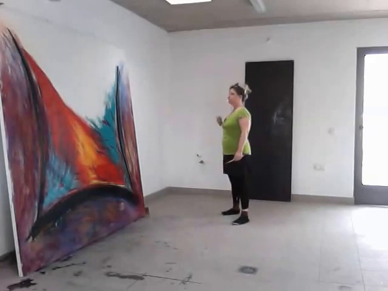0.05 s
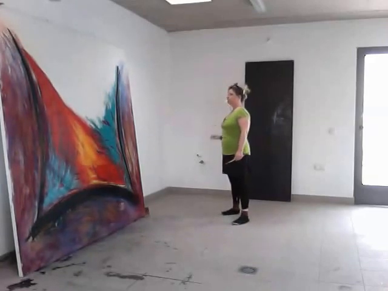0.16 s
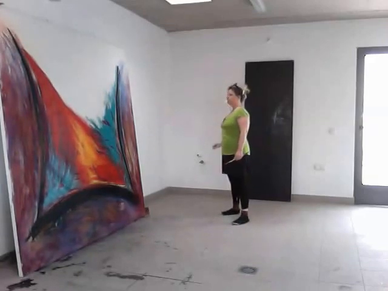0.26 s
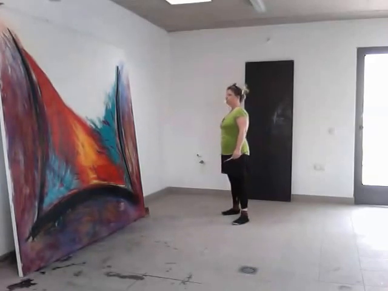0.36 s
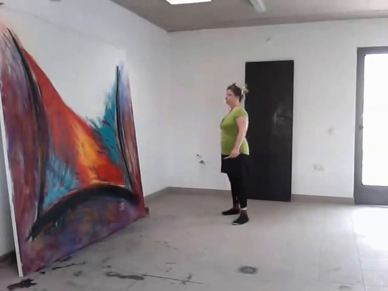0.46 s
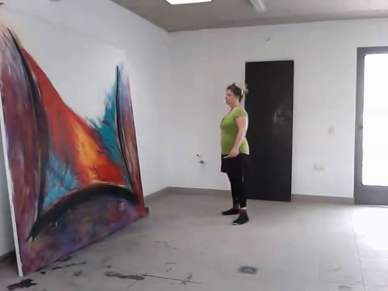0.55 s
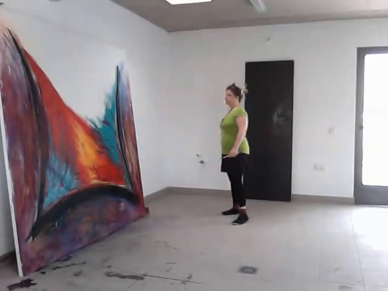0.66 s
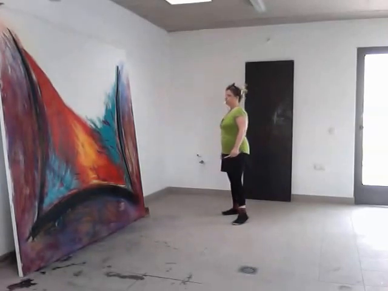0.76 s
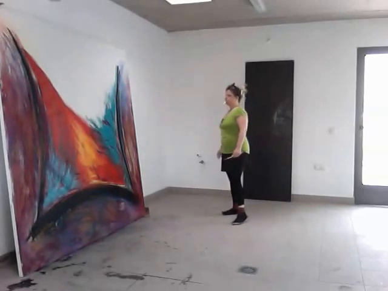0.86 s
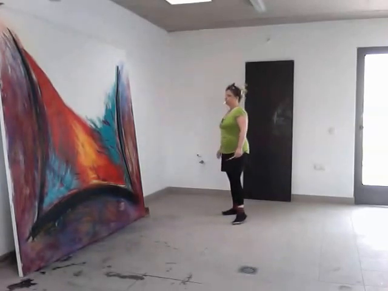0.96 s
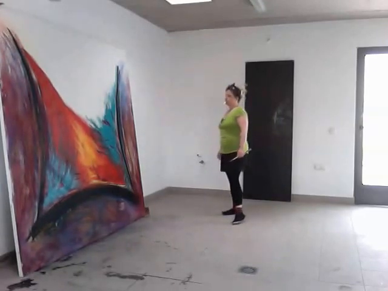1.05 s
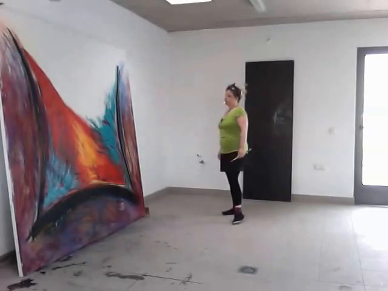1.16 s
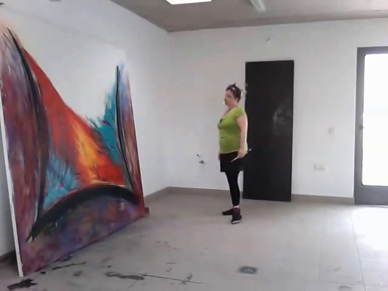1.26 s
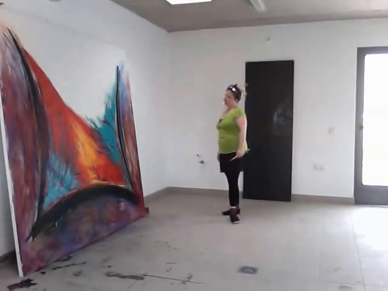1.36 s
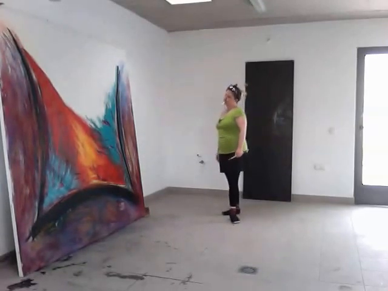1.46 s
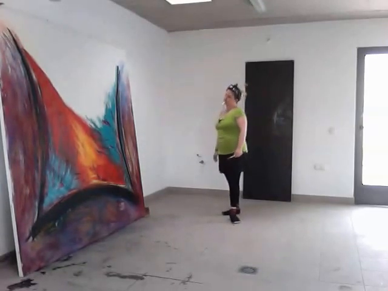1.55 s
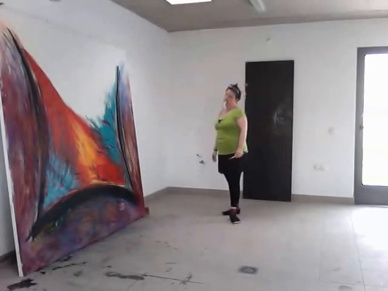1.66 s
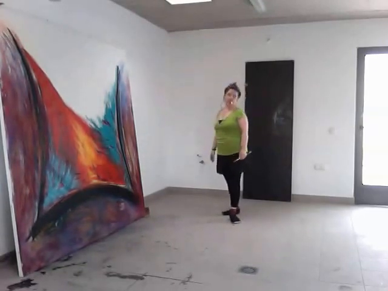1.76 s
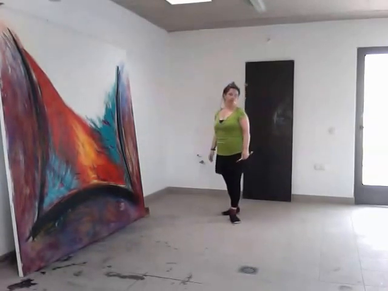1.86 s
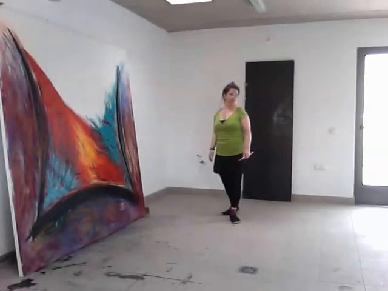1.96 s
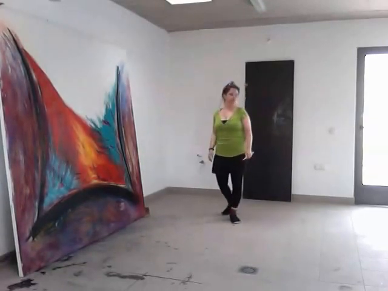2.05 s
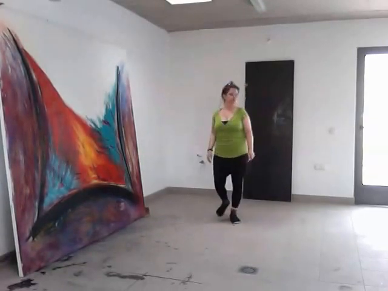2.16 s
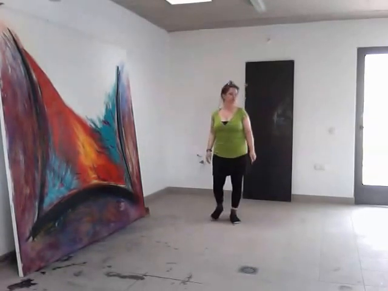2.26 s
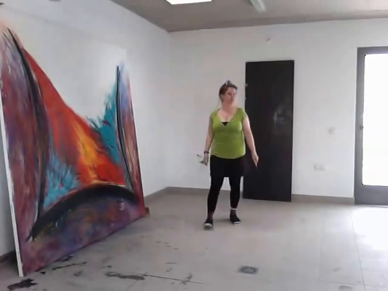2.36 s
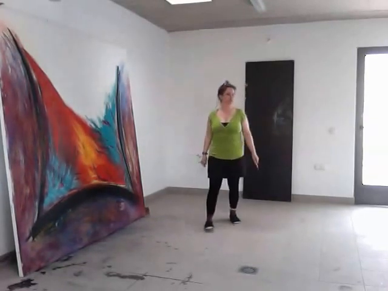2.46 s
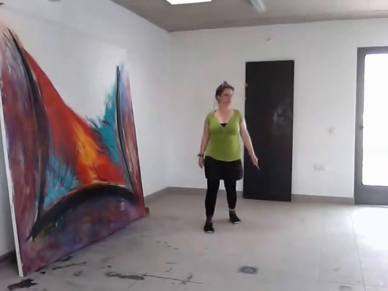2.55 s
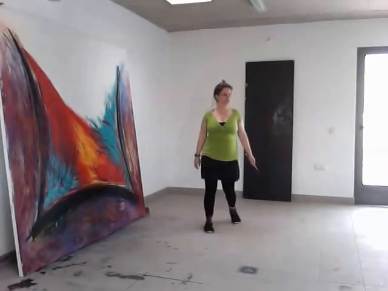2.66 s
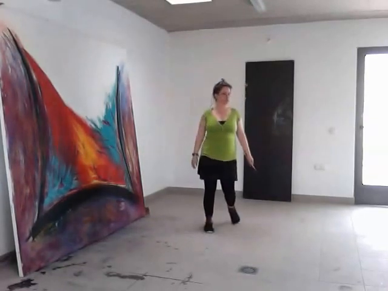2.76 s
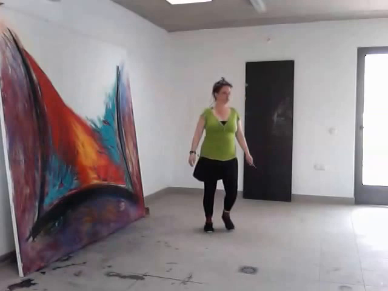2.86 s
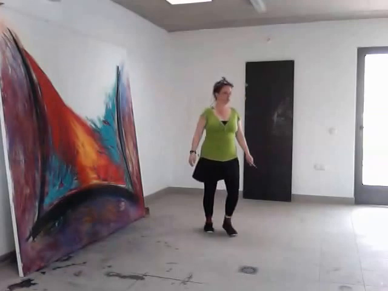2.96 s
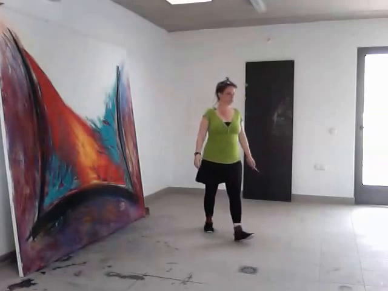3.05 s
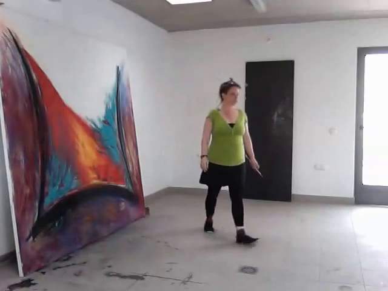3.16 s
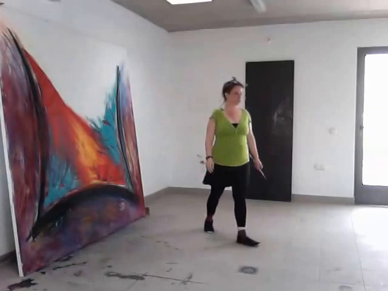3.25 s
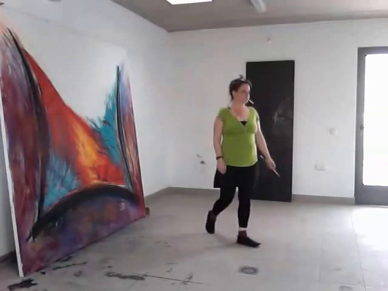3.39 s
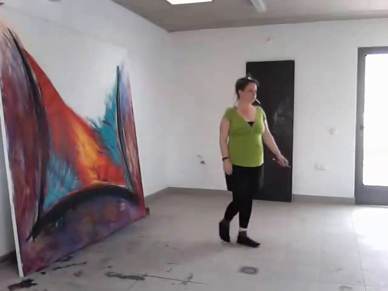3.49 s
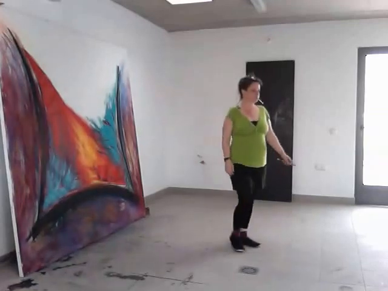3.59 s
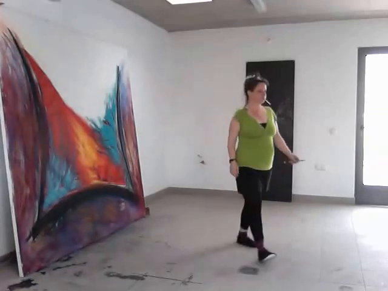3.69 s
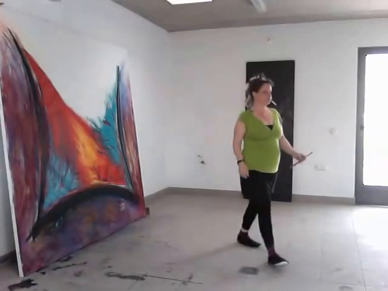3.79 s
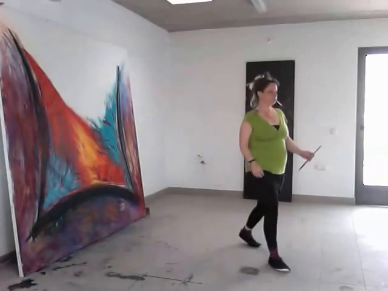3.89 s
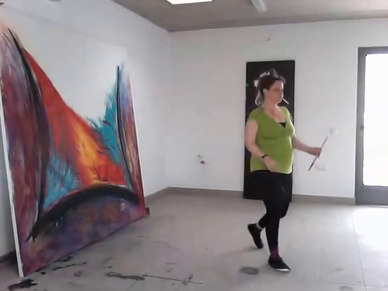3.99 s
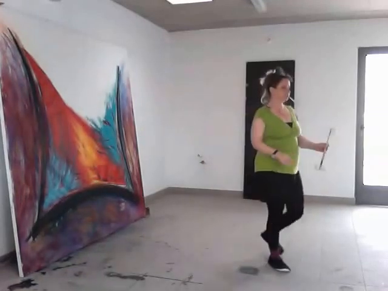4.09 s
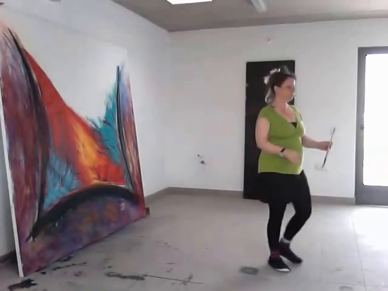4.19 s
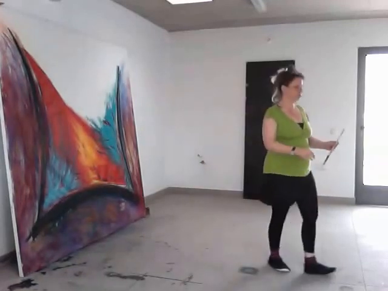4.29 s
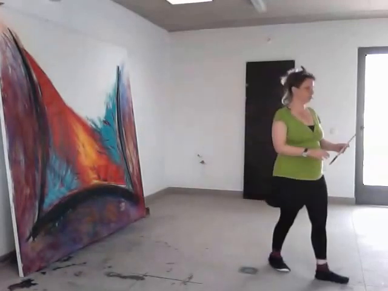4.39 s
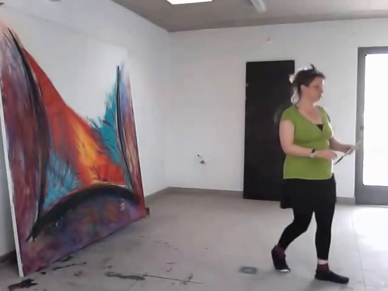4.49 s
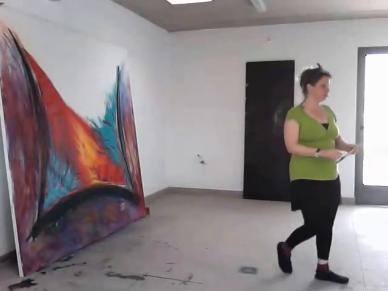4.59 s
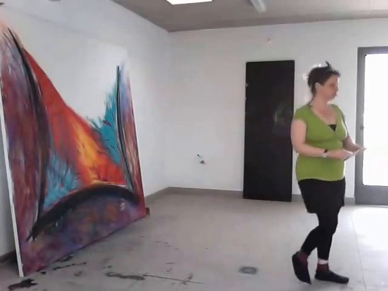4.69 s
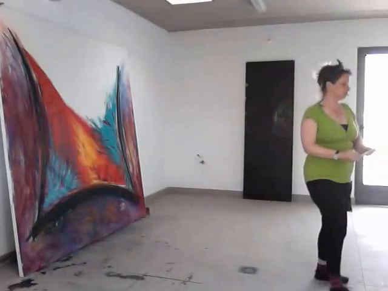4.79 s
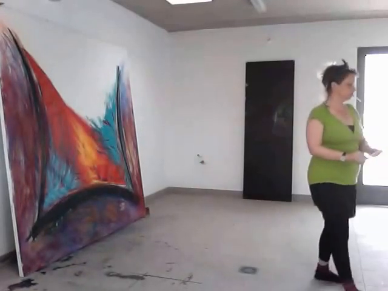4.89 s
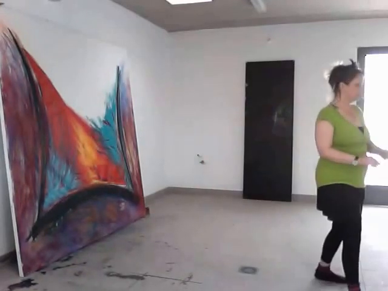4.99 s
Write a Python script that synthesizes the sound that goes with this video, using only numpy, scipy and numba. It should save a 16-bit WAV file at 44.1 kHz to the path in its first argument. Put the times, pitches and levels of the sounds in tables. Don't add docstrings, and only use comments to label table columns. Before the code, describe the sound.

One person in soft-soled shoes turns quietly on the spot at just over one second, pauses, then walks on a dusty tiled floor from about 2.2 seconds to the end. Each step is a short, sandy scrape with a small damped tap. The empty room rings for around half a second. Low ventilation-like rumble and smooth hiss stay faint, rising while the steps sound. Mono, slightly distant, without extreme treble.

```python
import sys
import numpy as np
from scipy import signal
from scipy.fft import rfft, irfft
from scipy.io import wavfile
from scipy.ndimage import uniform_filter1d
from numba import njit

SR = 44100
rng = np.random.default_rng(int(sys.argv[2]) if len(sys.argv) > 2 else 0)


def field_ratio(decibels):
    return 10 ** (np.asarray(decibels, dtype=float) / 20)


def persist_wave(psi):
    counts = np.round(np.clip(psi, -1, 1) * 32767).astype(np.int16)
    wavfile.write(sys.argv[1], SR, np.atleast_2d(counts).T)


N = 221955


def unit(x):
    return x / np.sqrt(np.mean(x ** 2))


def colour(x, table):
    hz, db = np.transpose(table)
    f = np.arange(len(x) // 2 + 1) * SR / len(x) + 1
    gain = field_ratio(np.interp(np.log(f), np.log(hz), db))
    return irfft(rfft(x) * gain, len(x))


def band(x, lo_hz, hi_hz, order=4):
    return signal.sosfilt(signal.butter(order, [lo_hz, hi_hz], "band", fs=SR, output="sos"), x)


@njit
def moving_resonance(x, hz, width):
    y, state_band, state_low = np.empty(len(x)), 0., 0.
    for i in range(len(x)):
        g, k = np.tan(np.pi * hz[i] / SR), width / hz[i]
        v = (state_band + g * (x[i] - state_low)) / (1 + g * (g + k))
        state_band = 2 * v - state_band
        state_low = state_low + 2 * g * v
        y[i] = k * v
    return y


def walk(rate, size=N):
    hold = int(SR / rate)
    levels = np.repeat(rng.standard_normal(size // hold + 1), hold)
    return 1.105 * uniform_filter1d(uniform_filter1d(levels, hold), hold)[:size]


BAND_SEAMS = [2000, 6000, 12000]


def split(x):
    size = x.shape[-1]
    octaves = np.log2(np.arange(size // 2 + 1) * SR / size + 1)
    above = [np.clip((octaves - np.log2(hz)) / .5 + .5, 0, 1) for hz in BAND_SEAMS]
    shares = -np.diff([np.ones_like(octaves), *above, 0 * octaves], axis=0)
    return [irfft(rfft(x) * share, size) for share in shares]


def steady(x):
    return x / np.sqrt(uniform_filter1d(uniform_filter1d(x ** 2, size=800), size=800))


def grit_slips(speck_db):
    density, spread_db, judder_db, specks_per_s = .4, 1.4, 3.5, 90.
    size = field_ratio(spread_db * np.minimum(rng.exponential(size=N), 3.5))
    slips = (rng.random(N) < density) * rng.standard_normal(N)
    out = unit(slips * size * field_ratio(judder_db * walk(90)))
    for hz in 1000 * 2 ** np.arange(0, 3.4, 1 / 3):
        hits = (rng.random(N) < specks_per_s / SR) * 1.
        specks = uniform_filter1d(hits, size=120) * rng.standard_normal(N)
        ring_hz = np.clip(hz * 2 ** (0.1145 * walk(45)), 500, 16000)
        out = out + field_ratio(speck_db) * np.sqrt(hz / 95000) * unit(moving_resonance(specks, ring_hz, 110.0))
    return band(out, 900, 17800)


def friction_bands(table, patchy_db, speck_db):
    rub = steady(colour(grit_slips(speck_db), table))
    return [unit(part * field_ratio(patchy_db * walk(35))) for part in split(rub)]


# (landing time [s], full level [dB], delay to full weight [s],
# delay to lift [s], sag [dB/s])
SLIDES = [
    (1.06, -70, 0.13, 0.22, 5),
    (1.232, -43.5, 0.065, 0.24, 36),
    (2.424, -31, 0.072, 0.23, 95),
    (3.041, -34, 0.072, .16, 94),
    (3.697, -34.5, 0.035, 0.2, 64.5),
    (4.288, -29.5, 0.067, 0.2, 64.5),
    (4.852, -31, 0.064, 0.16, 91),
]
# (landing under full level [dB], sole resonance [Hz], drag relative level [dB],
# grit relative level [dB], dust relative level [dB])
TREAD_COLOURS = [
    (8, 4000, -4, -12, -45),
    (25, 2840, -4, -18.5, -47),
    (4.12, 3660, -13, -6, -19),
    (0.5, 3500, -14.5, -6.5, -16),
    (0.5, 3950, -20.5, -5.5, -17),
    (3, 3860, -11.5, -7.5, -20.5),
    (7, 4200, -22, -5, -15.5),
]
# (frequency [Hz], spectrum level [dB per Hz])
STRIDE_SPECTRUM = [(590, -55.5), (1000, -30), (1230, -21), (1350, -14), (1900, -4), (3790, -5), (5600, -3),
                   (6960, -11.5), (7990, -11.5), (10300, -23), (11100, -28), (11900, -26), (13400, -33),
                   (15600, -27)]
# (frequency [Hz], spectrum level [dB per Hz])
TURN_SPECTRUM = [(530, -42), (900, -17), (1210, -5.5), (2130, -2), (4460, -9), (6900, -19), (8530, -25),
                 (10700, -36), (12000, -58), (15000, -52)]


def scuffs():
    turns, land_s = 2, 0.0073
    t = np.arange(N) / SR
    turn = friction_bands(TURN_SPECTRUM, patchy_db=1.5, speck_db=-2)
    stride = friction_bands(STRIDE_SPECTRUM, patchy_db=.8, speck_db=-8)
    out = np.zeros(N)
    for k, (slide, tread) in enumerate(zip(SLIDES, TREAD_COLOURS)):
        drag, sole, grit, dust = turn if k < turns else stride
        s, full_db, full_s, lift_s, sag = slide
        under_db, hz, drag_db, grit_db, dust_db = tread
        since = t - s
        light = np.clip(1 - since / full_s, 0, 1)
        slid = np.maximum(since - full_s, 0)
        lifted = np.maximum(since - lift_s, 0)
        swept = np.maximum(since - 0.15, 0)
        db = full_db - under_db * light - sag * slid - 259 * lifted
        touch = np.clip(since / land_s, 0, 1)
        flat = np.clip((since - .004) / land_s, 0, 1)
        centre = np.clip(hz * 2 ** -(0.05 * light + 2 * slid), 500, 9000)
        ring = 0.52 * sole + 0.6 * unit(moving_resonance(sole, centre, 1760.0))
        dull = field_ratio(drag_db - 10 * light + 25.5 * slid) * drag
        fine_grit = field_ratio(grit_db - 35.5 * slid) * grit
        fine_dust = field_ratio(dust_db - 52 * slid - 300 * swept) * dust
        out += touch * field_ratio(db) * (ring + dull + flat * (fine_grit + fine_dust))
    return out


# (time [s], peak level [dB], rise [s], fade [s], broad crackle relative level [dB])
TAPS = [(2.2199, -32, 0.0077, 0.018, -12), (2.7901, -26, 0.0064, 0.025, -1),
        (3.054, -20.5, 0.0061, 0.013, -9), (3.2387, -33, 0.0052, 0.0105, -9),
        (3.398, -69, 0.002, 0.003, -40), (3.704, -25.5, 0.0023, 0.011, -14),
        (3.9254, -31, 0.0062, 0.01, -5.5), (4.0719, -25, 0.0055, 0.034, -3.5),
        (4.2956, -24, 0.0032, 0.0182, 13), (4.559, -33.5, 0.0046, 0.0096, -11),
        (4.6395, -32.5, 0.006, 0.042, 0), (4.86, -26.5, 0.003, 0.009, -8)]
# (frequency [Hz], width [Hz], level [dB])
TOE_1 = [(1776, 470, -6.5), (2760, 610, -0.5), (3840, 340, 3), (4620, 1740, 5), (7540, 490, -12),
         (8530, 930, -11.5)]
TOE_2 = [(2150, 720, -9), (2980, 720, -1.5), (4500, 1450, 1.5), (5140, 1800, -6), (8070, 1400, -13),
         (13900, 2900, -31)]
TOE_3 = [(1910, 700, -0.15), (3800, 740, -2), (5360, 1100, -2.6)]
TOE_4 = [(2350, 820, -3.5), (3330, 520, -5), (5140, 980, 2), (6300, 1900, -7.5), (8770, 1100, -17)]
TOE_5 = [(2955, 540, 11), (4180, 690, 1.5)]
TOE_6 = [(1790, 660, -0.5), (3620, 1260, -1.5), (4650, 670, -0.5), (7360, 1000, -10)]
SPECK = [(13500, 3000, 0)]
HEEL = [(2787, 520, 6), (4340, 1500, -10)]
LAST_HEEL = [(2380, 440, -0.57), (4150, 850, -0.75)]


def ticks():
    out, t = np.zeros(N), np.arange(-.03 * SR, .15 * SR) / SR
    size = len(t)
    modes = (TOE_1, TOE_2, HEEL, HEEL, SPECK, HEEL, TOE_3, TOE_4, HEEL, TOE_5, TOE_6, LAST_HEEL)
    for (s, db, rise_s, fade_s, broad_db), rings in zip(TAPS, modes):
        shape = np.minimum(np.exp(t / rise_s), np.exp(-t / fade_s))
        crackle = band(shape * rng.standard_normal(size), 1410, 6000, order=3)
        tick = field_ratio(broad_db) * unit(crackle)
        for hz, width, ring_db in rings:
            flutter = field_ratio(6.5 * walk(45.0, size=size) * np.clip(t / fade_s, 0, 1))
            burst = shape * rng.standard_normal(size) * flutter
            tick = tick + field_ratio(ring_db) * unit(band(burst, hz - width / 2, hz + width / 2, order=3))
        i = int((s + t[0]) * SR)
        out[i:i + size] += field_ratio(db - 22.0) * unit(tick)
    return out


# (time [s], level [dB], length [s])
WEIGHT_SHIFTS = [
    (3.254, -62, .02),
    (3.913, -62.5, .015),
    (4.32, -63, 0.14),
]


def roll():
    t = np.arange(N) / SR
    rub = unit(band(rng.standard_normal(N), 610, 1060, order=2))
    gain = np.zeros(N)
    for s, db, length in WEIGHT_SHIFTS:
        early, late = np.maximum(s - t, 0), np.maximum(t - s - length, 0)
        gain += field_ratio(db - 300 * early - 87 * late)
    return rub * gain


# (frequency [Hz], reverberation time [s])
REVERBERATION = [(1000, 0.57), (3000, 0.64), (6000, 0.34), (12000, 0.087)]


def room(x):
    gap_s, tail_db = 0.0065, -5.5
    t, hop = np.arange(2 ** 15) / SR, int(.12 * SR)
    places = N // hop + 2
    _, t60 = np.transpose(REVERBERATION)
    parts = split(rng.standard_normal((places, len(t))))
    tails = 0
    for part, s in zip(parts, t60):
        tails = tails + part * np.exp(-np.log(1000) * t / s) / np.sqrt(s * SR / np.log(1e6))
    wet = np.zeros((places + 1) * hop + len(t))
    padded = np.pad(x, (hop, 2 * hop))
    for k, tail in enumerate(tails * (t > gap_s)):
        piece = padded[k * hop:(k + 2) * hop]
        fade = np.sin(np.pi * np.arange(len(piece)) / (2 * hop))
        wet[k * hop:k * hop + len(piece) + len(t) - 1] += signal.fftconvolve(piece * fade, tail)
    return 0.86 * x + field_ratio(tail_db) * wet[hop:hop + N]


def gate_db(steps):
    rest_db, range_db, knee_db, slope = 1.5, 9, -67, 0.38
    size = int(0.067 * SR)
    power = np.abs(uniform_filter1d(steps ** 2, size, origin=(size - 1) // 2))
    heard_db = 10 * np.log10(power + 1e-12)
    fall_db = 11.5 * np.arange(N) / SR
    open_db = np.clip(slope * (heard_db - knee_db), 0, range_db)
    return rest_db + np.maximum.accumulate(open_db + fall_db) - fall_db


# (frequency [Hz], spectrum level [dB per Hz])
RUMBLE_SPECTRUM = [(12, -73), (20, -42), (64, -18.5), (87, -3), (119, -5), (202, -2), (295, -4.5),
                   (338, -8), (401, -7.5), (429, -8.5), (615, -7.5), (1200, -11), (1560, -48), (2640, -120)]
# (frequency [Hz], spectrum level [dB per Hz])
HISS_SPECTRUM = [(710, -56), (1200, -1), (2070, -2.5), (2190, -2), (4480, -6), (4880, -8), (5670, -10.5),
                 (9680, -21.5), (11200, -33), (15500, -39)]


def hum():
    rumble = unit(colour(rng.standard_normal(N), RUMBLE_SPECTRUM))
    hiss = unit(colour(rng.standard_normal(N), HISS_SPECTRUM))
    return field_ratio(-70 + .5 * walk(5)) * rumble + field_ratio(-69) * hiss


def scene():
    steps = room(scuffs() + ticks())
    return (steps + field_ratio(gate_db(steps)) * hum() + roll())[None]


def roll_off(x):
    return signal.sosfilt(signal.butter(12, 15700, fs=SR, output="sos"), x)


def record(dry):
    notch = signal.butter(4, [11300, 12400], "bandstop", fs=SR, output="sos")
    top = signal.ellip(8, .2, 70, 15600, fs=SR, output="sos")
    mix = signal.sosfilt(np.vstack([notch, top]), dry)
    return roll_off(mix)


dry = scene()
out = record(dry)
persist_wave(out)
```